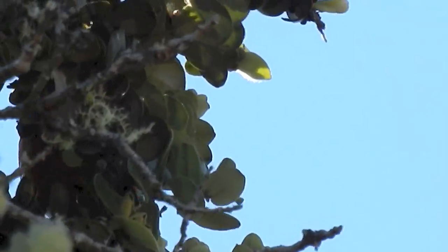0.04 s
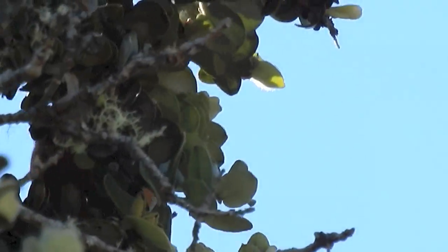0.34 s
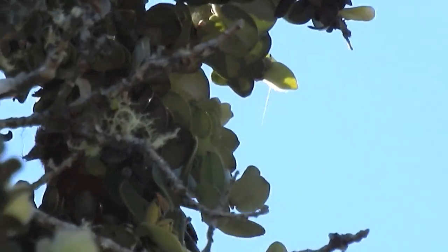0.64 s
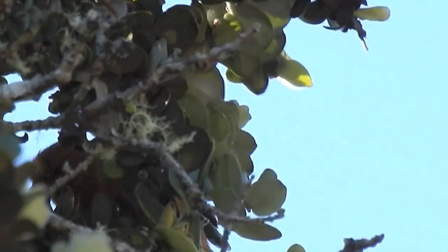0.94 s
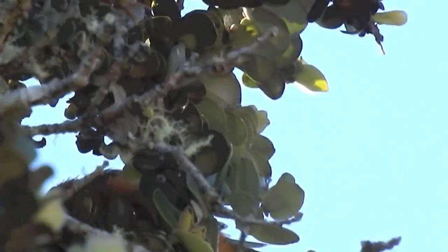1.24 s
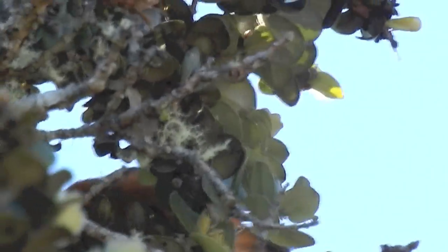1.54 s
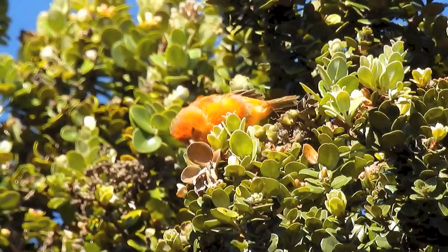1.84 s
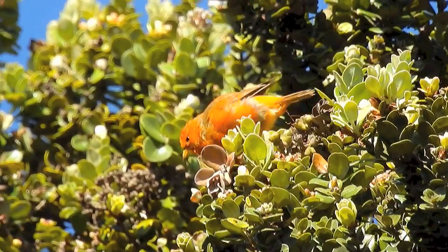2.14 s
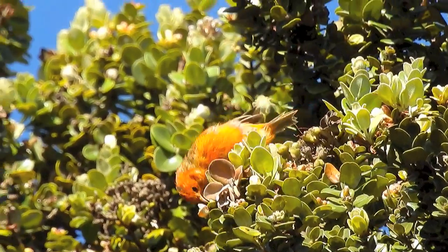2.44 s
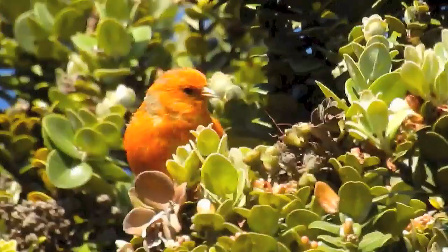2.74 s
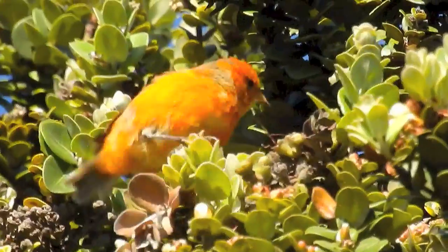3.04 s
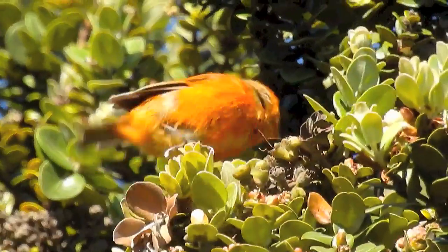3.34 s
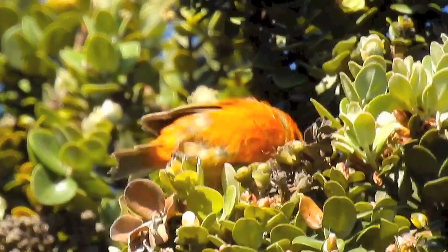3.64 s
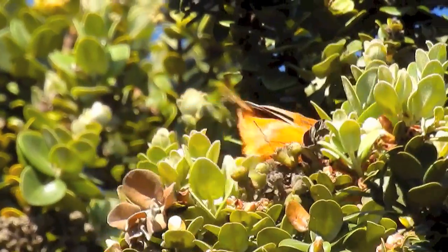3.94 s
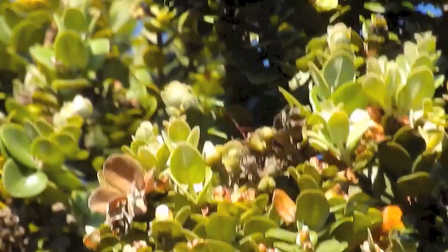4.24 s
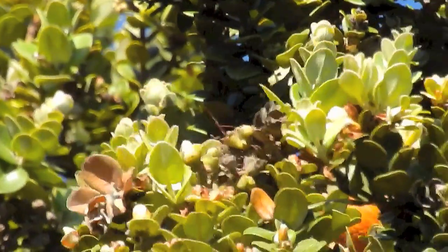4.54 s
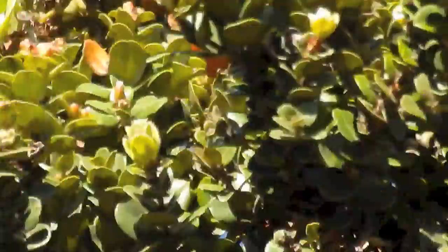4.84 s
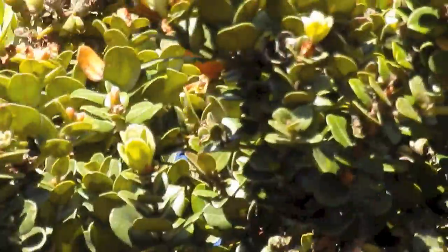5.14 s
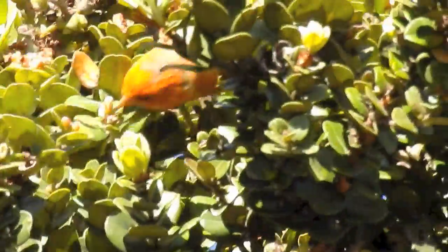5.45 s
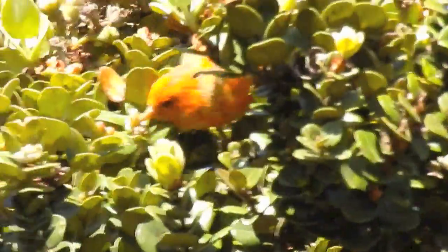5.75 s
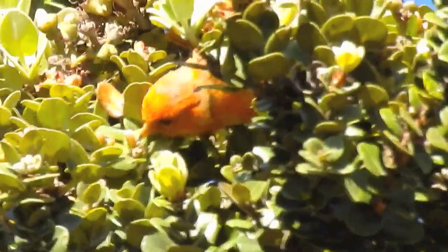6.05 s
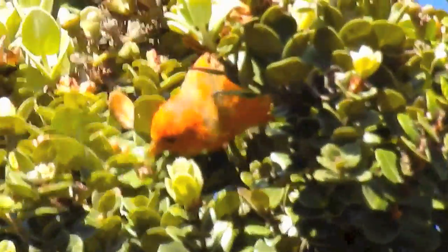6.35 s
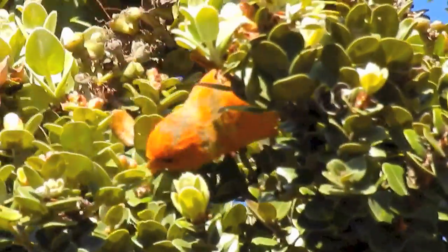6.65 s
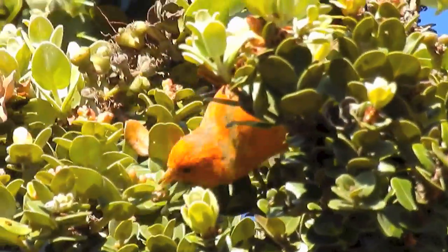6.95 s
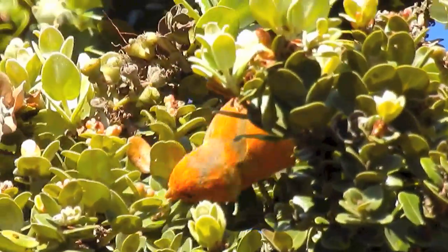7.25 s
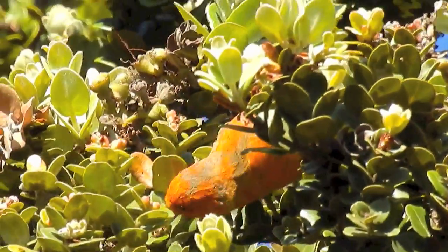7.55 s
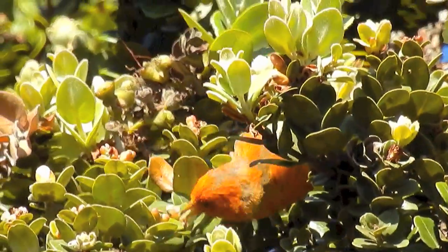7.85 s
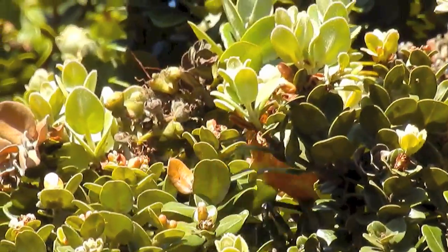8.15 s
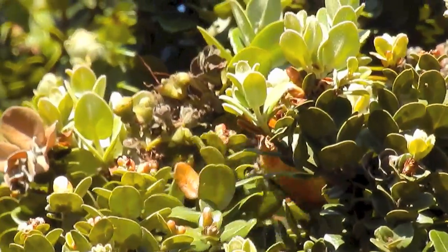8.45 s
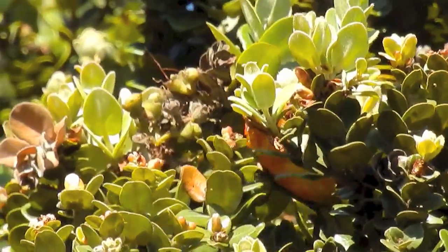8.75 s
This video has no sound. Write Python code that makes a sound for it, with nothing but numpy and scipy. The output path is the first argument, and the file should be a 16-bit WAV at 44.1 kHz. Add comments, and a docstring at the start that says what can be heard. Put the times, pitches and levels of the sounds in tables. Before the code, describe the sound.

Brief high chirps and warbles of forest songbirds over a steady low rumble and hiss, with light handling knocks and one loud low thump.

```python
"""A near bird's three-part warbling song is heard twice; a far bird's falling whistle is heard twice, and
others call faintly. Each note is a gliding, wavering tone, echoed by foliage and trunks. Gusts buffet and bump
the microphone; a hand-held camera body knocks and ticks. Behind lie a low murmur, leaves and hiss. The
background steps in level, and the whole sound dips briefly three times."""
import sys
import numpy as np
from scipy import signal
from scipy.fft import rfft, irfft, next_fast_len
from scipy.io import wavfile
from scipy.ndimage import uniform_filter1d, map_coordinates

SR = 44100
rng = np.random.default_rng(int(sys.argv[2]) if len(sys.argv) > 2 else 0)


def unload_audio(sound):
    """Save the sound as a 16-bit wav file, at the path given as the first command line argument."""
    columns = np.transpose(np.atleast_2d(sound))
    # keep every value between -1 and 1, then stretch to whole-number steps
    steps = np.round(np.clip(columns, -1, 1) * 32767)
    wavfile.write(sys.argv[1], SR, steps.astype(np.int16))


N = 392931

# Lens modes. Each row: frequency in Hz, level in dB, t60 in seconds.
LENS_MODES = [(750.7, -3, .06), (994, -0.5, 0.047), (1140, -6.5, 0.037), (1332, -5.5, 0.032),
              (1874, -6.5, .024), (2500, -6, 0.012), (3400, -4.5, 0.013)]
# Level dips. Each row: fall start, fall time, rise start, rise time, all in seconds, floor in dB.
DIPS = [(1.722, 0.00074, 1.707, 0.37, -46), (2.823, 0.004, 2.86, 0.083, -15),
        (3.501, 0.025, 3.618, 0.027, -14)]


def near_bird():
    """A clear warble that reaches the left port first; its echo is cut off at each level dip."""
    # Song parts. Each row: offset and length in seconds, first, middle and last pitch in Hz, level in dB.
    arch = [(0, .062, 2080, 2700, 3080, -3), (.078, 0.0427, 3040, 2926, 2690, 0.5)]
    phrase = [(-.004, 0.091, 2575, 2430, 2517, -12), (.145, 0.074, 2113, 1940, 1870, -22.5),
              (.258, 0.0564, 2206, 2362, 2380, -13.5), (.4, .022, 3200, 3630, 4360, -14),
              (.414, .055, 2930, 3042, 2416, -0.5), (.497, 0.076, 2220, 2337, 2270, -13.5),
              (.657, .03, 3100, 3700, 4310, -18.5), (.668, 0.0785, 2620, 2539, 2257, -4),
              (.81, .075, 1780, 1885, 1734, -21.5)]
    flourish = [(-.05, 0.06, 1386, 1582, 1800, -26.5), (0, .066, 2001, 2342, 2540, -10.5),
                (.073, 0.0764, 2802, 2560, 2640, -1.5), (.12, .049, 2560, 2790, 3100, -0.5)]
    # Entries of each part. Each row: start in seconds, gain in dB.
    arch_starts = [(1.762, -40.5), (7.214, -50.5)]
    phrase_starts = [(1.968, -36), (7.416, -42.5)]
    flourish_starts = [(2.937, -33.5), (3.314, -35.5), (8.438, -46)]
    song = repeated(arch, arch_starts) + repeated(phrase, phrase_starts)
    song += repeated(flourish, flourish_starts)
    voice = sing(song, waver=0.012, rasp=0.0025, flutter_db=2.5, overtone_db=-33,
                 attack=0.23, release=0.25)
    section = np.searchsorted([start_s + fall_s for start_s, fall_s, *_ in DIPS], np.arange(N) / SR)
    gates = [section == k for k in np.unique(section)]
    tails = sum(gate * echo(voice * gate, early_db=2.5, early_t60_s=0.19, shared=2.7) for gate in gates)
    left, right = amp(-1) * pan(6) * voice + amp(-4.5) * pan(1.4) * tails
    return np.array([left, np.roll(right, 1)])


def far_whistler():
    """A falling whistle that arrives mostly as echo."""
    # Each row: offset and length in seconds, first, middle and last pitch in Hz, level in dB.
    notes = [(0, .035, 6050, 5800, 5650, -55), (.015, 0.071, 5640, 5580, 5490, -47),
             (.07, 0.051, 5900, 5470, 4940, -43), (.08, 0.091, 5350, 4510, 4130, -46.5),
             (.16, 0.078, 4140, 4140, 4140, -45), (.281, 0.05, 5200, 4870, 4500, -48.5),
             (.343, .06, 6200, 5520, 5080, -44), (.37, 0.074, 6050, 5200, 4420, -44.5),
             (.404, 0.07, 4500, 3660, 3130, -51)]
    # Each row: song start in seconds, gain in dB.
    starts = [(.152, -1.5), (6.39, -2)]
    voice = sing(repeated(notes, starts), waver=0.00071, rasp=0.0067, flutter_db=1.6, overtone_db=-45,
                 attack=0.35, release=0.44)
    return amp(-5) * voice + amp(0.5) * echo(voice, early_db=-6, early_t60_s=0.36, shared=0.73)


def other_birds():
    """Scattered faint calls, echoed by the trees."""
    # Each row: start and length in seconds, first, middle and last pitch in Hz, level in dB.
    calls = [(0, .13, 3000, 3044, 3065, -63.5), (.785, 0.04, 2910, 3050, 3020, -61),
             (.915, 0.068, 2426, 2385, 2170, -68), (1.02, 0.043, 3080, 3100, 3200, -65),
             (1.21, .071, 2230, 2334, 2280, -66), (1.445, .047, 2210, 2320, 2380, -70),
             (1.538, 0.039, 4940, 5100, 5680, -57), (2.372, 0.084, 6010, 6850, 4800, -56),
             (2.81, 0.015, 6140, 6440, 6300, -53.5), (3.705, .073, 3490, 3950, 4400, -67),
             (4.745, .06, 4900, 4360, 3540, -66), (5.06, 0.022, 3320, 3450, 3330, -52.5),
             (5.66, .04, 3320, 3090, 2720, -63.5), (5.715, 0.029, 5320, 5070, 4800, -61.5),
             (5.9, 0.074, 2750, 2400, 2500, -72), (5.935, .13, 4900, 4900, 4980, -63),
             (6.035, 0.059, 2320, 2425, 2410, -68), (6.07, .09, 5050, 5190, 5370, -56),
             (6.19, 0.19, 2820, 3094, 3045, -63), (6.41, .09, 3080, 3080, 3060, -66.5),
             (6.9, 0.059, 2150, 2250, 2270, -68), (8.215, 0.1, 3400, 3780, 3400, -72)]
    voice = sing(calls + stray_calls(), waver=0.008, rasp=0.0022, flutter_db=2, overtone_db=-43,
                 attack=0.22, release=0.19)
    return voice + amp(-3.5) * echo(voice, early_db=-1.5, early_t60_s=0.11, shared=1)


def stray_calls(per_s=2, centre_hz=3200, length_s=0.06, level_db=-71.5):
    """Short notes at uneven intervals, each with its own pitch and glide."""
    count = int(per_s * N / SR)
    starts_s = (np.arange(count) + rng.random(count)) / count * (N / SR - 1)
    offset_oct = 0.28 * rng.normal(size=(count, 1))
    glide_oct = 0.13 * rng.normal(size=(count, 1)) * [-1, 0, 1]
    pitches_hz = centre_hz * 2 ** (offset_oct + glide_oct)
    return [(s, length_s, *hz, level_db) for s, hz in zip(starts_s, pitches_hz)]


def chatter():
    """Birds too far off to tell apart: bouts of flickering noise near 3 kHz."""
    # Each row: centre and half width in seconds, level in dB.
    bouts = [(.1, 0.68, -66), (1.3, 0.27, -71), (2.15, 0.21, -59), (3.8, 0.45, -67.5), (5.0, 0.15, -62),
             (5.42, 0.21, -64), (7.55, 0.58, -65)]
    spectrum_hz_db = [(1400, -9), (2200, -7), (3000, 3.5), (3500, -3), (4500, -26.5)]
    return swells(bouts) * amp(2.1 * wobble(30)) * rush(spectrum_hz_db)


def sing(notes, waver, rasp, flutter_db, overtone_db, attack, release):
    """Each note whistles an arc through three pitches; steeper glides are raspier."""
    voice, drift, flutter = np.zeros(N), wobble(420), wobble(140)
    for start_s, length_s, first_hz, middle_hz, last_hz, db in notes:
        u = np.linspace(0, 1, int(length_s * SR))  # share of the note, as are attack and release
        at = int(abs(start_s) * SR)
        span = slice(at, at + len(u))
        glide_oct_per_s = abs(np.log2(last_hz / first_hz)) / length_s
        arc_hz = np.polyval(np.polyfit([0, 0.5, 1], [first_hz, middle_hz, last_hz], 2), u)
        hz = arc_hz * (1 + (waver + rasp * glide_oct_per_s) * drift[span])
        phase = 2 * np.pi * np.cumsum(hz) / SR
        tone = np.sin(phase) + amp(overtone_db) * np.sin(2 * phase)
        envelope = np.sin(np.pi / 2 * np.clip(np.minimum(u / attack, (1 - u) / release), 0, 1))
        add(voice, start_s, np.sqrt(2) * amp(db + flutter_db * flutter[span]) * envelope * tone)
    return voice


def echo(x, early_db, early_t60_s, shared):
    """Nearby foliage scatters a call at once; trunks farther off add a longer tail."""
    # Each row: frequency in Hz, t60 in seconds.
    trunk_decay = [(1000, 1), (3000, 0.6), (6000, 0.66), (12000, 0.14)]
    noise = rng.standard_normal((3, SR))
    hz, t, bins = signal.stft(noise[:2] + shared * noise[2], SR, nperseg=256)
    decay = amp(-60 * t / along(trunk_decay, hz)[:, None]) + amp(early_db - 60 * t / early_t60_s)
    tail = signal.istft(bins * decay * (t > 0), SR, nperseg=256)[1]
    return signal.fftconvolve(x[None], tail / np.linalg.norm(tail[0]), axes=1)[:, :N]


def wind():
    """Eddies buffet each port; the hardest push the microphone into a short low boom."""
    # Each row: centre and half width in seconds, level in dB.
    gusts = [(.05, 0.099, -50), (1.3, 0.19, -55.5), (2.2, 0.02, -53), (3.32, .13, -39), (4.72, .1, -60),
             (5.27, 0.15, -52), (5.92, 0.14, -48.5), (6.35, 0.46, -52.5), (7.6, 0.11, -58)]
    # Each row: start in seconds, level in dB, frequency in Hz, t60 in seconds.
    bumps = [(.154, -28.5, 79, 0.073), (2.128, -30, 59.3, 0.075), (2.204, -26.5, 85.5, 0.063),
             (3.152, -11.5, 75.5, 0.045), (3.217, -15.5, 82.2, 0.24), (3.268, -24, 77.05, 0.2),
             (3.327, -21, 86, 0.12), (3.39, -20, 69, 0.17), (3.439, -19, 91, 0.16),
             (5.785, -21.5, 83, 0.055), (6.035, -27, 68, 0.17)]
    # Each row: frequency in Hz, relative density in dB.
    buffet_spectrum = [(13, -55), (22, -3), (52, -2.5), (75, 1), (102, -8.5), (124, -5.5), (200, -20),
                       (260, -38), (440, -120)]
    rumble_spectrum = [(35, -32), (60, -9.5), (130, 0), (210, -1), (310, -9), (430, -12.5), (600, -18.5),
                       (800, -21), (1200, -45.5)]
    buffet_db, rumble_db, *_ = bed_levels_db()
    strength = np.hypot(amp(buffet_db) * pan(0.87), swells(gusts) * pan(3))
    eddies = amp(3.1 * np.array([wobble(14), wobble(14)]))
    air = amp(7) * strength * unit(eddies * rush(buffet_spectrum))
    air += amp(rumble_db + 3 + 3.25 * wobble(22) + 0.59 * wobble(2.993)) * rush(rumble_spectrum)
    t = np.arange(SR // 3) / SR
    for start_s, db, hz, t60_s in bumps:
        port_skew_rad = np.array([[0], [rng.choice([-1, 1]) * rng.uniform(0.67, 1.9)]])
        envelope = amp(db - 60 * t / t60_s) * (1 - np.exp(-t / 0.0062))
        boom = envelope * np.sin(2 * np.pi * hz * t + port_skew_rad)
        add(air, start_s, boom * pan(13.5))  # wind strikes the left port harder
    return air


def handling():
    """The camera body knocks and ticks in the hand. A hard click, played among the knocks, sounds just before
    the first level dip."""
    # Knocks, and the click at 1.716 s. Each row: start in seconds, level in dB, hardness in dB.
    knocks_and_click = [(.225, -30.5, -5), (.373, -29.5, -0.5), (.694, -35, -4), (1.141, -33, -12),
                        (1.324, -27.5, -3.5), (1.627, -34, -17), (1.716, -34.5, 4), (2.23, -40, -14),
                        (2.46, -41, -7.5), (2.724, -35.5, -11), (3.647, -34.5, -12.5), (3.786, -33, -9.5),
                        (3.875, -31, -2), (4.618, -35, -14), (4.715, -34, -7), (5.048, -35.5, 1.5),
                        (5.367, -37.5, -1), (6.001, -33.5, -5.5), (6.462, -31.5, -2.5), (6.612, -30, -2.5),
                        (6.934, -35, -1.5), (7.565, -27.5, -2.5), (8.435, -47.5, -6), (8.66, -46.5, -6)]
    # Each row: frequency in Hz, level in dB, t60 in seconds.
    body_modes = [(107.7, -3, 0.07), (164, 2.5, 0.073), (223.4, -7, 0.045), (349, -7.5, 0.048),
                  (430, -12.5, 0.044), (585.6, -10.5, 0.064)]
    # Lens ticks and thin dry clicks. Each row: start in seconds, level in dB.
    ticks = [(1.119, -47.5), (2.727, -38.5), (2.91, -32.5), (3.037, -39), (3.311, -27), (3.401, -42.5),
             (3.64, -45.5), (3.966, -46.5), (5.134, -44), (6.113, -45), (6.461, -38.5), (6.715, -39),
             (7.79, -44), (7.922, -44), (8.022, -49.5), (8.39, -45)]
    snaps = [(.1442, -36.5), (1.6755, -56), (2.173, -38), (2.3116, -43.5), (6.7246, -31)]
    body, lens, scuff, snap = np.zeros((4, N))
    t = np.arange(SR // 8) / SR
    for start_s, db, hard_db in knocks_and_click:  # harder: brighter, with more scuff
        modes = [(hz, mode_db + hard_db * min(1, (hz / 450) ** 2), t60_s)
                 for hz, mode_db, t60_s in body_modes]
        add(body, start_s, amp(db + 2) * ring(modes, attack_s=0.004, scatter_db=2.5))
        add(scuff, start_s, amp(db - 18.5 + 0.6 * hard_db) * np.exp(-((t - 0.02) / 0.015) ** 2))
    for start_s, db in ticks:
        add(lens, start_s, amp(db + 0.5) * ring(LENS_MODES, attack_s=0.0003, scatter_db=1))
    for start_s, db in snaps:
        add(snap, start_s, amp(db - 8 - 60 * t / 0.029))
    friction_hz_db = [(2500, -4.5), (5000, 6), (7000, 9), (8500, 5), (10500, -12), (15000, -26)]
    friction = (scuff + snap) * rush(friction_hz_db)
    return body * pan(-2.4) + (lens + rattle()) * pan(-4) + friction


def rattle(per_s=19, spread_db=9):
    """Soft, uneven ticks on the lowest lens modes, following the murmur's level."""
    ticks, murmur_db = np.zeros(N), bed_levels_db()[2]
    count = int(per_s * N / SR)
    for slot, (delay, size) in enumerate(rng.random((count, 2))):
        at = int((slot + delay) / count * N)
        tick = ring(LENS_MODES[:3], attack_s=0.0065, scatter_db=2.5)
        add(ticks, at / SR, amp(murmur_db[at] + 3 + spread_db * size) * tick)
    return ticks


def ring(modes, attack_s, scatter_db):
    """One blow on damped modes, peak 1, with random strengths, detuning and phases."""
    t = np.arange(SR // 5) / SR
    x = np.zeros(len(t))
    for hz, db, t60_s in modes:
        decay = amp(db + scatter_db * rng.normal() - 60 * t / t60_s)
        detuned_hz = hz * (1 + 0.04 * rng.normal())
        x += decay * np.sin(2 * np.pi * (detuned_hz * t + rng.random()))
    x *= 1 - np.exp(-(t / attack_s) ** 2)
    return x / np.abs(x).max()


def background():
    """A low, quickly pulsing murmur, rustling leaves and microphone hiss."""
    # Each row: frequency in Hz, relative density in dB.
    murmur_spectrum = [(300, -28), (560, -1.5), (740, 2), (860, 5), (1000, -4.5), (1250, -7), (1700, -7),
                       (2800, -9.5), (4500, -32)]
    leaf_spectrum = [(1500, -14.5), (2600, -11), (3500, -0.5), (5000, 0.5), (6600, 3), (8000, -10),
                     (10000, -22), (15000, -41)]
    hiss_spectrum = [(200, 14.5), (2000, -11), (6000, 2.5), (8500, 0), (10500, -2.5), (13000, -7),
                     (15700, -11.5)]
    *_, murmur_db, leaves_db, hiss_db = bed_levels_db()
    pulsing = amp(4.1 * wobble(45) + 0.5 * wobble(4))
    murmur = amp(murmur_db + 1) * unit(pulsing * rush(murmur_spectrum)) * pan(-2.05)
    leaves = amp(leaves_db + 2.1 * wobble(20) + 0.67 * wobble(4.07)) * rush(leaf_spectrum) * pan(-2.8)
    return murmur + leaves + amp(hiss_db) * rush(hiss_spectrum)


def bed_levels_db(ramp_s=0.04):
    """Five background levels per sample, stepping between steady stretches."""
    # Each row: start in seconds, then buffet, rumble, murmur, leaf and hiss levels in dB.
    stretches = [(0, -60, -56.5, -71, -62, -60.5), (1.05, -64, -54.5, -69.5, -59.5, -57.5),
                 (1.72, -62.5, -66, -63, -62.5, -69.5), (2.87, -55, -61, -56.5, -55.2, -61),
                 (3.56, -61.5, -56.5, -73, -62.5, -60.5), (7.1, -63, -57, -66.5, -61.5, -60.5),
                 (7.98, -74, -71.5, -68, -70.5, -73.5)]
    starts_s, *levels_db = np.transpose(stretches)
    which = np.searchsorted(starts_s[1:], np.arange(N) / SR)
    return [uniform_filter1d(db[which], int(ramp_s * SR)) for db in levels_db]


def rush(spectrum):
    """Stereo noise of rms 1, most alike left and right in the middle frequencies."""
    # Each row: frequency in Hz, left-right correlation.
    coherence = [(40, 0.18), (120, 0.51), (250, 0.49), (900, 0.72), (2000, 0.84), (4000, 0.49),
                 (10000, 0.031)]

    def mid_side_gains(hz):
        angle_rad = np.arccos(np.clip(along(coherence, hz), -1, 1)) / 2
        return amp(along(spectrum, hz)) * [np.cos(angle_rad), np.sin(angle_rad)]

    mid, side = filtered(rng.standard_normal((2, N)), mid_side_gains)
    return unit(np.array([mid + side, mid - side]))


def swells(rows):
    """Gain of bell-shaped swells whose powers add."""
    t = np.arange(N) / SR
    return np.sqrt(sum(amp(db) ** 2 * np.exp(-((t - s) / width_s) ** 2) for s, width_s, db in rows))


def repeated(notes, starts):
    """The same notes at each start, with that start's gain."""
    return [(start_s + s, *shape, db + gain_db) for start_s, gain_db in starts for s, *shape, db in notes]


def wobble(knots_per_s):
    """A smooth random curve."""
    knots = rng.standard_normal(int(N * knots_per_s / SR) + 4)
    return map_coordinates(knots, [np.arange(N) * knots_per_s / SR])


def filtered(x, response):
    """Apply a gain given as a function of Hz."""
    size = next_fast_len(N + SR // 2)
    return irfft(rfft(x, size) * response(np.fft.rfftfreq(size, 1 / SR)), size)[..., :N]


def along(points, hz):
    """Interpolate (Hz, value) points on a log axis."""
    points_hz, values = np.transpose(points)
    return np.interp(np.log(hz + 1), np.log(points_hz + 1), values)


def add(track, start_s, sound):
    """Mix a sound into a track."""
    at = max(0, round(start_s * SR))
    track[..., at:at + sound.shape[-1]] += sound[..., :N - at]


def pan(left_over_right_db):
    """Left and right gains."""
    return amp(np.array([[left_over_right_db], [-left_over_right_db]]) / 2)


def amp(db):
    """Decibels to gain."""
    return 10 ** (np.asarray(db) / 20)


def unit(x):
    """Scale to rms 1."""
    return x / np.sqrt(np.mean(x ** 2) + 1e-20)


def scene():
    """Near bird on the left, far birds slightly right, over wind, handling and background."""
    birds = near_bird() + pan(-1.8) * (far_whistler() + other_birds() + chatter())
    return birds + wind() + handling() + background()


def record(dry):
    """The level dips on straight ramps; the deepest bass and top treble are cut."""
    low_cut_hz, top_hz = 31, 15800
    t = np.arange(N) / SR
    gain = np.ones(N)
    for start_s, fall_s, back_s, rise_s, floor_db in DIPS:
        ramps = np.maximum(1 - (t - start_s) / fall_s, (t - back_s) / rise_s)
        gain *= np.clip(ramps, amp(floor_db), 1)
    return filtered(dry * gain, lambda hz: (hz < top_hz) * hz ** 4 / (hz ** 4 + low_cut_hz ** 4))


dry = scene()
out = record(dry)
unload_audio(out)
```